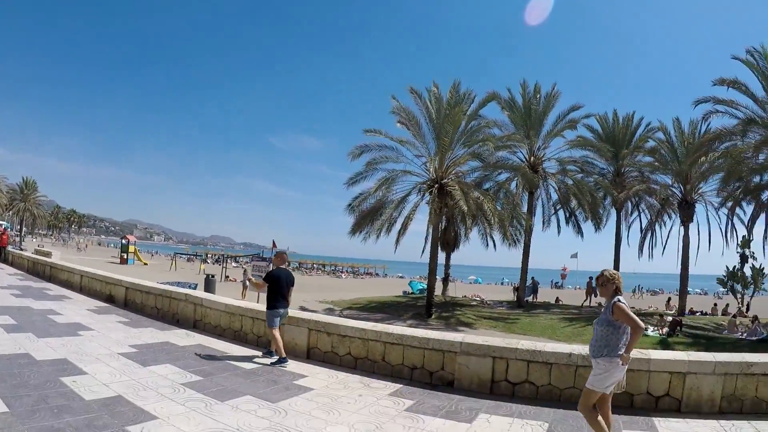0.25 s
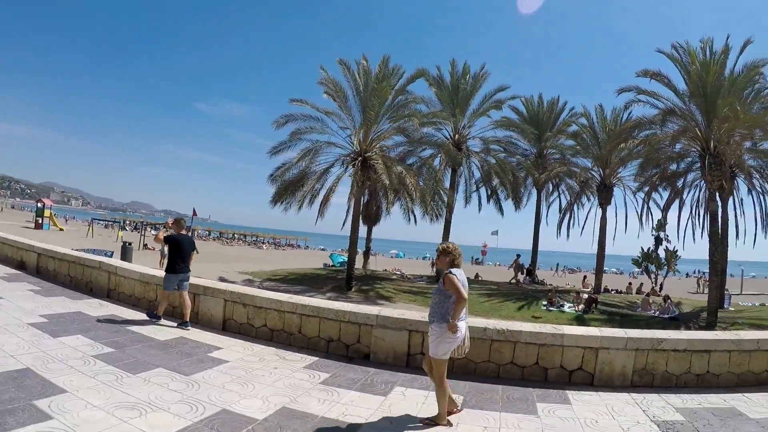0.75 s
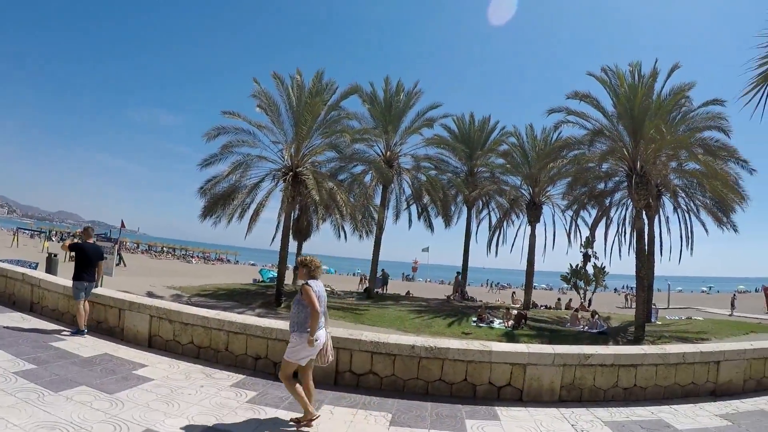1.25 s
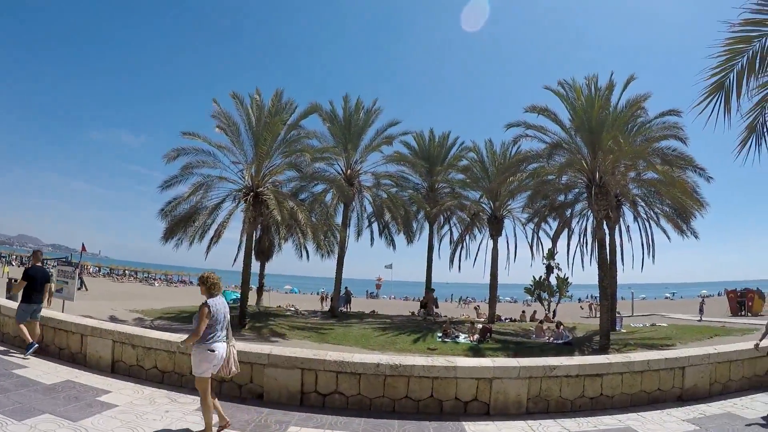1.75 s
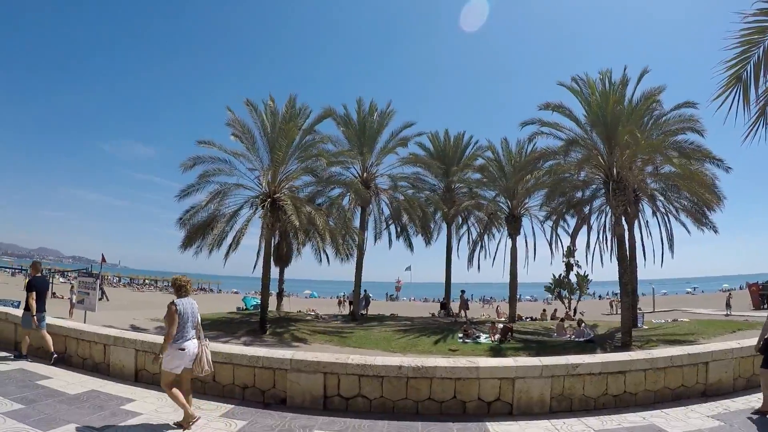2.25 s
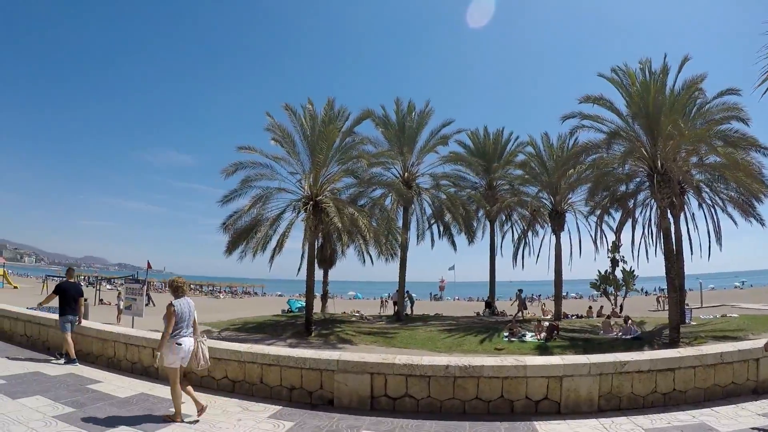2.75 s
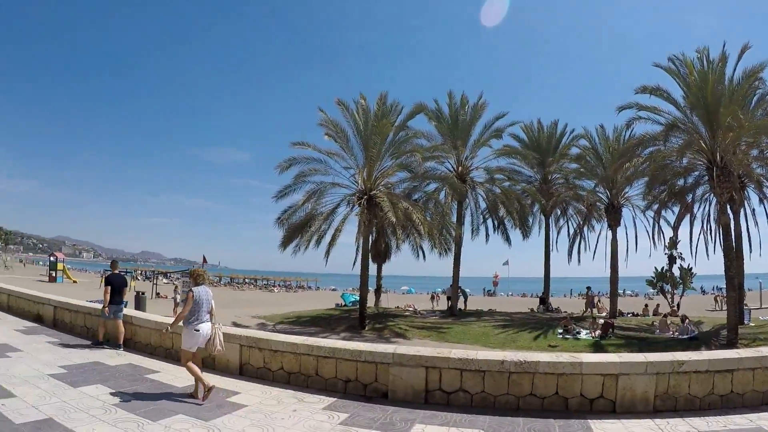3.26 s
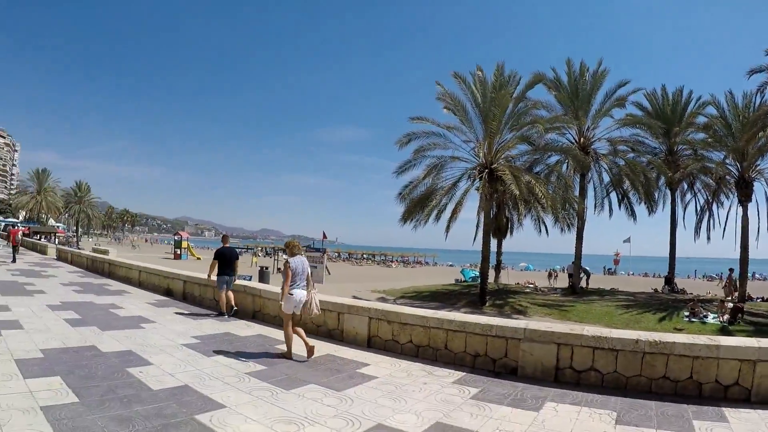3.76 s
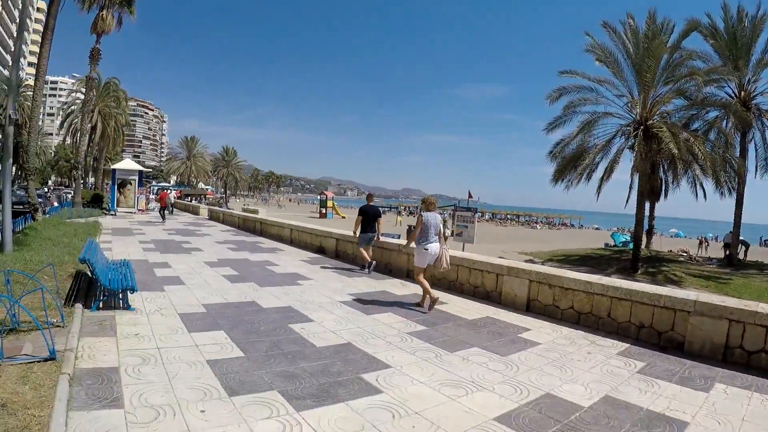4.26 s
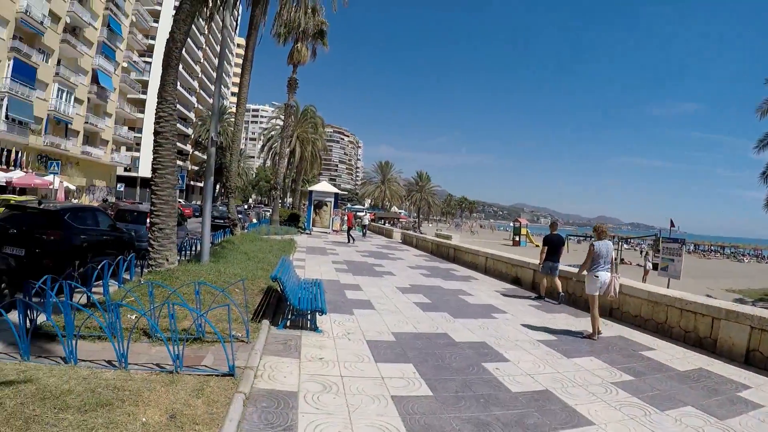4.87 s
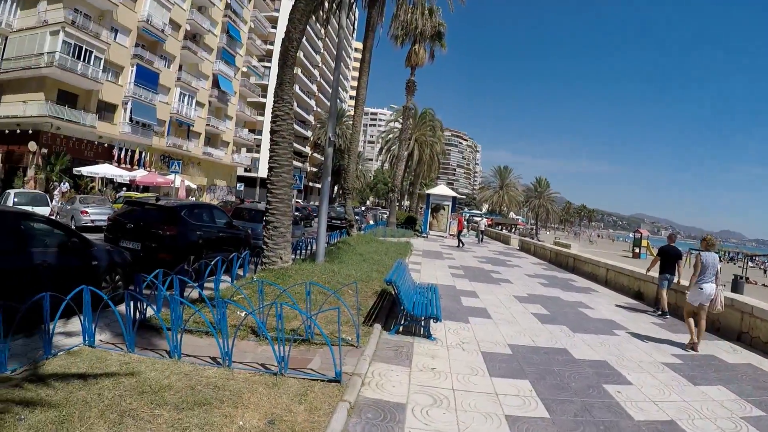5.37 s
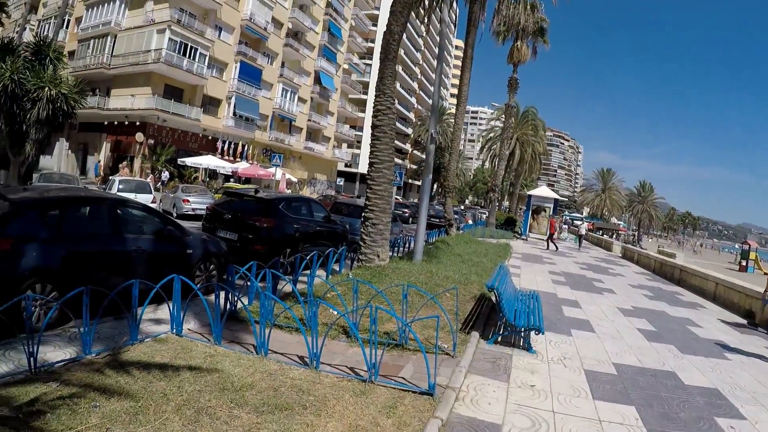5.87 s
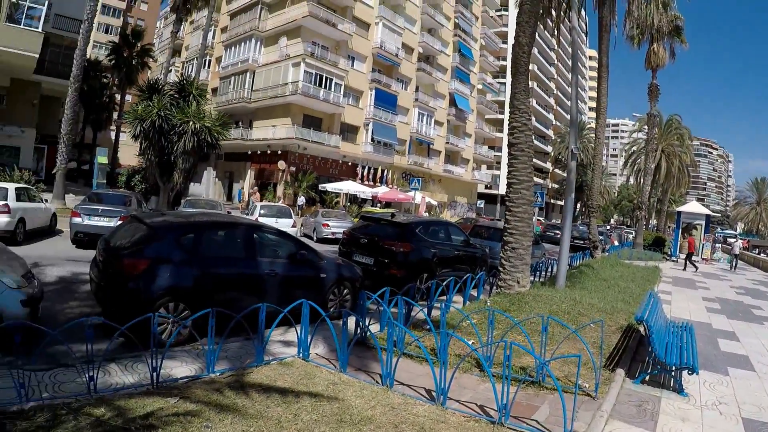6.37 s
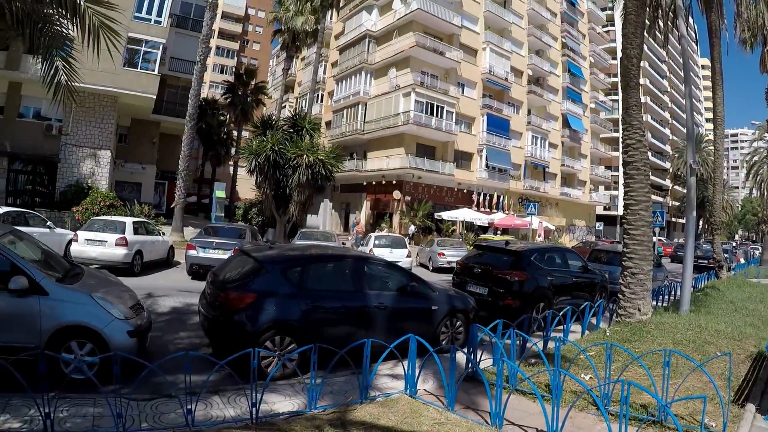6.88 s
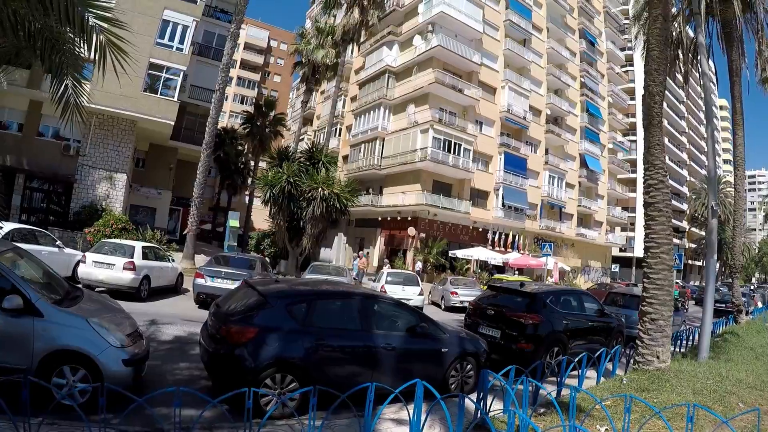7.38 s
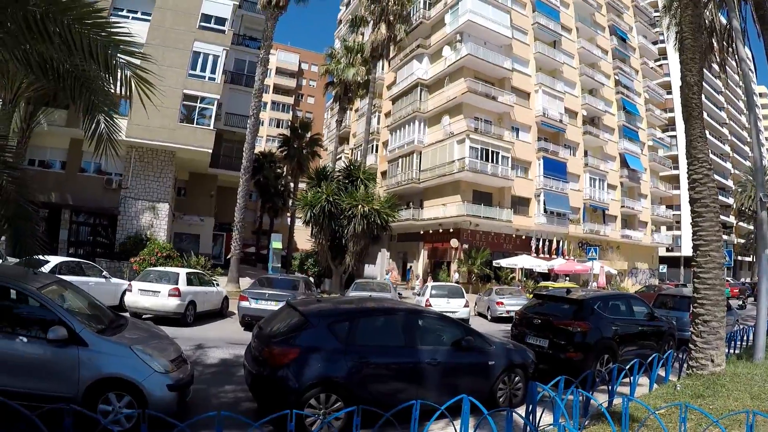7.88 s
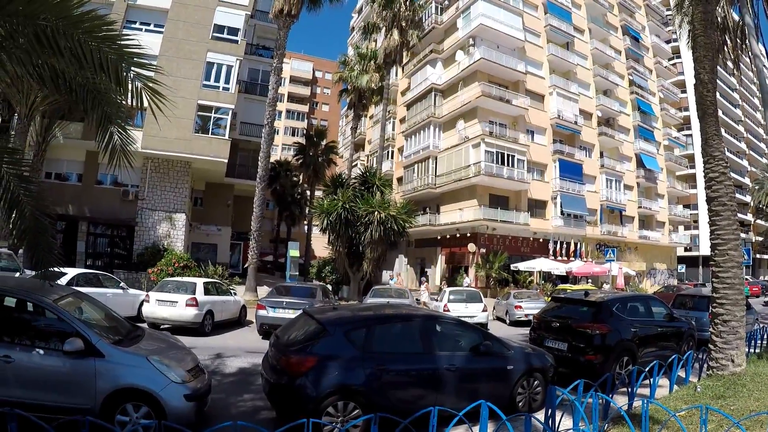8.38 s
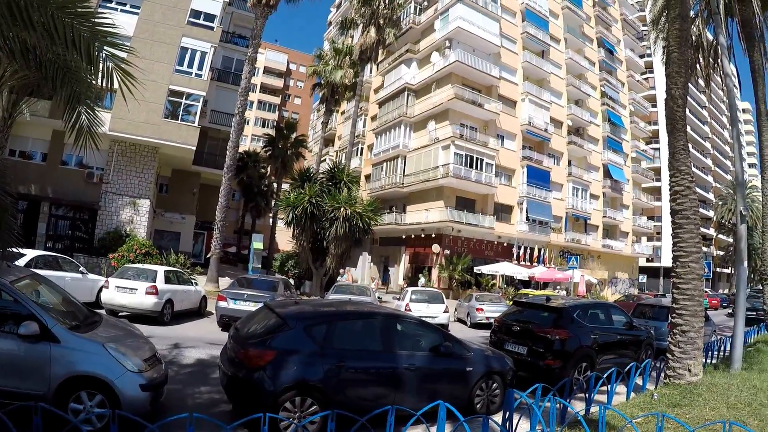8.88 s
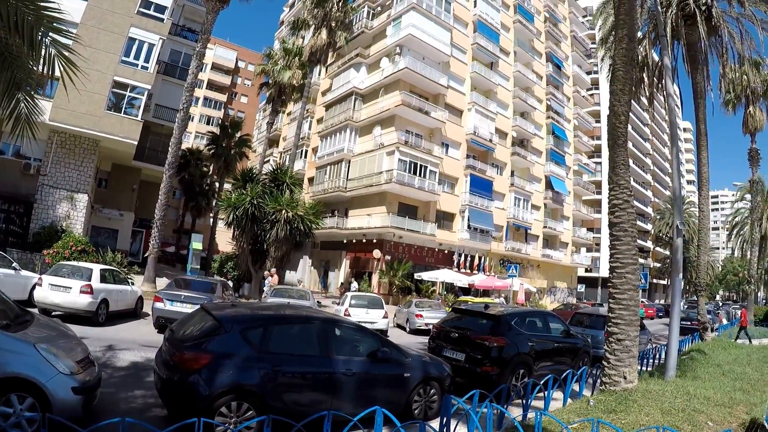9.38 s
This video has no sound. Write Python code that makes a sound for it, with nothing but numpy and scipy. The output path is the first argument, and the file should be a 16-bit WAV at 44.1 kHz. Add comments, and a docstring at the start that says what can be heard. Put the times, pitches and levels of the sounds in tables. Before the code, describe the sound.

Wind rumbles in lumps against a small camera's two microphones while parakeets squawk in nearby trees. Brief, bright chirps and hoarse cries come in clusters with gaps; a distant engine hums up and down once. Later the calls break into rattling screeches, then after a short lull turn into rapid, jumpy two-register chatter. Behind everything lies a quiet, uneven wash of surf and street, with slight open-air echoes.

```python
"""A flock of parakeets squawks in palm trees by a seafront: warbled notes are gliding stacks of overtones,
rattled squawks are bursts of hoarse voice through a ringing throat, and chatter flips between two registers.
Wind buffets the two microphone ports of a small camera, as lumpy low noise with a sharper edge.
Surf and street noise lie behind as slowly swelling noise, with a few dry ticks; a far engine revs once,
made of three sines that rise and fall together."""
import sys
import numpy as np
from scipy import signal
from scipy.fft import rfft, irfft, next_fast_len
from scipy.io import wavfile
from scipy.ndimage import uniform_filter1d, map_coordinates

SR = 44100
rng = np.random.default_rng(int(sys.argv[2]) if len(sys.argv) > 2 else 0)


def digitize_waveform(pressure):
    """Quantize a signal to 16-bit integers and store it at the path in sys.argv[1].

    Rows of a 2-D input are taken as channels; values are limited to [-1, 1].
    """
    field = np.atleast_2d(pressure).T
    bounded = np.clip(field, -1, 1)
    quanta = np.round(bounded * 32767).astype(np.int16)
    wavfile.write(sys.argv[1], SR, quanta)


N = 424683

# Clear notes. Each row: start in seconds, length in milliseconds, middle pitch in Hz before the warble,
# glide over the note in %, number of the overtone the beak favours, level in dB before the trembling.
NOTES = [(.355, 37, 2670, -34, 1, -41.5), (.46, 24, 5304, -5, 1, -44.5), (.482, 43, 5380, 3, 1, -32.5),
         (.527, 48, 5350, 0.5, 1, -40), (.574, 32, 892, 6, 6, -36), (0.612, 32, 1205, -9.5, 2, -36),
         (0.7, 25, 2270, 4, 3, -33.5), (1.157, 8.5, 1650, -40, 2, -47), (1.167, 8, 1226, 3, 2, -40.5),
         (1.206, 52, 1834, 3, 2, -39.5), (1.513, 32, 628, 0.5, 4, -46), (1.548, 26, 1043, 1, 2, -48),
         (1.681, 20.5, 2180, -2, 1, -44.5), (1.78, 32, 973, 9.5, 3, -31.5), (1.813, 15, 1600, 4, 2, -35),
         (1.828, 26, 1466, -12, 2, -38), (1.86, 18, 1960, 0, 2, -40), (1.882, 24, 1215, -3, 2, -39),
         (2.15, 39, 837, 15, 3, -39.5), (2.346, 27, 1810, -4.5, 1, -35), (2.432, 35, 927, 10.5, 3, -32.5),
         (2.466, 21, 1180, -3.5, 4, -31), (2.494, 8, 1970, 0, 2, -36), (2.503, 12, 1660, -33, 2, -32),
         (2.562, 12.7, 2060, -11, 2, -36), (2.584, 14, 1650, -23, 2, -37), (3.091, 30, 850, 37, 3, -40),
         (3.125, 28, 1150, -16, 2, -39), (3.157, 10, 1900, -2, 2, -33), (3.171, 7, 1370, -2, 2, -32),
         (3.179, 14.5, 1880, 9, 2, -34), (3.198, 18, 1900, -1, 2, -33.5), (3.22, 7, 1900, -10, 2, -35),
         (3.241, 15, 1310, 35.5, 2, -35), (3.426, 30, 1314, -34.5, 2, -41),
         (3.467, 29, 1514, -18.5, 2, -40.5), (3.624, 27, 897, 45.5, 3, -33), (3.66, 10, 1900, -4, 2, -31),
         (3.701, 13.5, 1480, -36, 2, -36), (3.716, 46, 1235, -5, 2, -40), (3.927, 35, 935, 3, 5, -30.5),
         (3.962, 31, 1096, 5.5, 3, -34), (4, 16, 1300, -25, 2, -39), (4.063, 10, 1396, -24, 2, -36),
         (4.073, 10.6, 1394, 27, 2, -35), (4.936, 7.4, 650, 2, 8, -43), (4.957, 10, 650, 3, 8, -34),
         (4.978, 16, 645, -7, 8, -34.5), (5.008, 13, 630, -14, 4, -38.5), (5.086, 52, 1130, 4.5, 3, -39.5),
         (5.27, 17, 1187, -3, 2, -31.5), (5.49, 18.7, 1055, 4.5, 4, -30), (5.893, 23, 830, 22, 4, -32),
         (6.054, 35.6, 2670, 7.5, 1, -27.5), (6.082, 21, 1240, -1, 5, -28.5), (6.28, 27, 1017, 5.5, 6, -28),
         (6.312, 28, 1312, -8.5, 4, -25.5), (7.356, 16, 1366, -10, 2, -41.5),
         (7.378, 24, 1335, -11, 2, -38), (7.518, 19, 2260, 0.5, 1, -32), (7.781, 13, 930, 1, 4, -37),
         (7.813, 20, 960, -6, 4, -38), (7.851, 23, 1596, 5, 2, -41), (7.874, 13, 1356, -54, 2, -32.5),
         (7.907, 7.6, 1395, -52, 2, -31), (7.965, 18, 786, 14, 3, -36), (7.988, 17, 1307, 17, 3, -32),
         (8.013, 14, 2040, 3.5, 2, -24), (8.035, 8.7, 1257, -5, 3, -36),
         (8.05, 12.8, 1980, -12.5, 2, -28.5), (8.07, 15, 1255, 5, 2, -34), (8.095, 7, 1650, -9.5, 2, -25.5),
         (8.119, 7.2, 2010, 1, 2, -28), (8.133, 13, 1195, -5, 2, -28.5), (8.15, 20.5, 2050, -8, 2, -26.5),
         (8.191, 18, 1814, -42, 2, -35), (8.27, 21, 1130, 9, 4, -32.5), (8.296, 23, 1152, 10.5, 2, -30.5),
         (8.328, 22, 2050, -15, 2, -22.5), (8.351, 10, 1200, 1, 2, -28), (8.372, 19, 2160, -5, 2, -31),
         (8.432, 13, 2110, -3, 2, -29), (8.446, 16, 1103, 17, 4, -32), (8.472, 16, 2074, 5, 2, -25),
         (8.508, 12, 2024, -7, 2, -26), (8.526, 11, 2350, 7, 2, -26.5), (8.541, 8.9, 1700, -39, 2, -36),
         (8.6, 10, 1970, -14, 2, -24.5), (8.615, 6.4, 1473, 3, 2, -27), (8.631, 6, 1520, -2, 2, -27),
         (8.638, 12.7, 2000, -17.5, 2, -24.5), (8.665, 17, 1907, 0, 2, -19), (8.688, 9.6, 2250, 8, 2, -28),
         (8.735, 8.4, 2200, 3, 2, -33), (8.772, 7.5, 2130, 2, 2, -28.5), (8.787, 16, 1550, -42, 2, -32.5),
         (8.748, 47, 2120, 18.5, 1, -37), (8.89, 24, 1975, 6, 3, -30.5), (8.897, 12, 1247, 3, 3, -30),
         (8.918, 7.7, 2014, 2, 2, -24), (8.932, 14, 1280, -1.5, 4, -25.5), (8.954, 14, 1300, 1.5, 4, -29),
         (8.985, 8.1, 2010, 0.5, 2, -21.5), (9.016, 13, 1954, -2.5, 2, -30.5),
         (9.04, 17, 1112, 9.5, 2, -34.5), (9.179, 29, 827, 14, 3, -36), (9.212, 24, 1034, 1, 5, -30.5),
         (9.249, 6.3, 1800, 1, 2, -28), (9.26, 31.4, 1114, 8, 4, -27.5), (9.348, 11, 2210, 0.5, 2, -30.5),
         (9.366, 29, 957, 6.5, 3, -40), (9.399, 25, 975, -5, 4, -37.5), (9.427, 24, 1520, -11, 2, -35),
         (9.468, 17.4, 1415, -13, 2, -34), (9.512, 5.8, 1960, -2, 2, -23), (9.524, 7.7, 1393, 5, 2, -32),
         (9.547, 13.6, 1985, -13.5, 2, -27), (9.572, 6, 1940, -6.5, 2, -29),
         (9.588, 23.4, 2004, -13, 2, -26.5)]
# How strongly each frequency of a bird's voice comes through. Each row: frequency in Hz, relative level in dB.
VOICE = [(600, -19), (1400, -10.5), (2300, 1.5), (3800, -1), (5200, -2.5), (7000, -0.5), (8300, -14.5),
         (10700, -23.5), (14500, -97)]


def amp(db):
    """Turn decibels into a plain multiplier."""
    return 10 ** (np.asarray(db) / 20)


def unit(x):
    """Scale a sound to an average strength (rms) of 1."""
    return x / np.sqrt(np.mean(x ** 2) + 1e-20)


def along(points, hz):
    """Read a curve of (Hz, value) points on a log frequency axis."""
    f, v = np.transpose(points)
    return np.interp(np.log(hz + 1), np.log(f + 1), v)


def curves(rows):
    """Give one value per sample for each column after the time."""
    times, *columns = np.transpose(rows)
    return [np.interp(np.arange(N) / SR, times, column) for column in columns]


def wobble(rate):
    """A smooth random curve through `rate` random points a second."""
    points = rng.standard_normal(int(N * rate / SR) + 4)
    return map_coordinates(points, [np.arange(N) * rate / SR])


def filtered(x, response):
    """Multiply the spectrum of x by a response to frequency, which may be complex."""
    m = next_fast_len(N + SR // 2)
    return irfft(rfft(x, m) * response(np.fft.rfftfreq(m, 1 / SR)), m)[..., :N]


def noise(spectrum):
    """Random noise shaped by a table of (Hz, dB), rms 1."""
    return unit(filtered(rng.standard_normal(N), lambda hz: amp(along(spectrum, hz))))


def ringing(x, modes, tuning, leak):
    """Pass x through resonances side by side; a share leaks past them. The result has rms 1."""
    out = leak * x
    for hz, width, db in modes:
        b, a = signal.iirpeak(hz * tuning, hz / width, SR)
        out = out + amp(db) * signal.lfilter(b, a, x)
    return unit(out)


def voice(pitch):
    """A buzzing membrane: a flat stack of up to ten overtones, rms 1."""
    phase = 2 * np.pi * np.cumsum(pitch) / SR
    return unit(sum(np.cos(k * phase + k * k) * (k * pitch < 14000) for k in range(1, 11)))


def gusts():
    """Strength of the wind in dB: each gust climbs out of the breeze and sinks back."""
    # Wind between the gusts. Each row: time in seconds, strength in dB.
    breeze = [(0, -25.5), (1.1, -35), (1.5, -33.5), (3, -45), (3.6, -35), (5.9, -34), (6.3, -49),
              (9.63, -41)]
    # Each row: time of the peak in seconds, peak strength in dB, seconds to climb the last 10 dB,
    # seconds to sink the first 10 dB.
    peaks = [(.18, -20, 0.11, 0.2), (.59, -26.5, 0.21, 0.75), (3.19, -22, 0.19, 0.19),
             (4.91, -20, 0.16, 0.058), (5.04, -20.5, 0.064, 0.097), (5.25, -24.5, 0.1, 0.23),
             (5.98, -25.5, 0.092, 0.24), (6.63, -27.5, 0.34, 0.27), (6.95, -24.5, 0.22, 0.18),
             (7.72, -27.5, 0.31, .98), (8.58, -19, 0.16, 0.087), (9.52, -26.5, 0.12, 0.14)]
    strength_db, = curves(breeze)
    t = np.arange(N) / SR
    for peak, db, rise, fall in peaks:
        distance = np.where(t < peak, (peak - t) / rise, (t - peak) / fall)
        strength_db = np.maximum(strength_db, db - 10 * distance)
    return strength_db


def wind():
    """Lumpy turbulence at each port: harder gusts get a sharper edge and strike the left port more."""
    # Three noise colours: steady low wind, buffeting, sharp edge. Each row: frequency in Hz, relative level in dB.
    rumble_colour = [(30, -9), (60, -9), (110, -14), (300, -85)]
    buffet_colour = [(30, -11), (70, -0.5), (120, 4), (180, -3), (300, -20), (600, -87.5)]
    edge_colour = [(120, -39), (200, 0.5), (400, -11.5), (800, -26.5), (1500, -101)]
    gust_db = gusts()
    force = gust_db + 30.5  # dB above a middling wind
    shared_rumble, shared_edge = noise(rumble_colour), noise(edge_colour)
    pair = []
    for side in (1, -1):  # left, right
        lumps = unit(amp(0.45 * wobble(19) + 3.53 * wobble(40)))
        # The edge partly pushes one port as it pulls the other.
        edge = 0.62 * side * shared_edge + 0.66 * noise(edge_colour)
        turbulence = noise(buffet_colour) + amp(-12.0 + .5 * force) * edge
        buffeting = amp(gust_db + 1.5 + side * (3.5 + 0.16 * force)) * lumps * turbulence
        rumble_level = amp(-31.5 + 0.25 * force + 1.0 * side + 1.25 * wobble(6.0))
        rumble = rumble_level * (shared_rumble + 0.5 * noise(rumble_colour))
        pair.append(buffeting + rumble)
    return np.array(pair)


def surf_and_street():
    """Broad noise that swells and sinks: a part shared by the ports and a part that differs between them."""
    # Colour of surf and street. Each row: frequency in Hz, relative level in dB.
    shore = [(120, -44), (200, -2), (330, -5.5), (700, -6.5), (900, -11), (1760, -12), (2560, -20),
             (6100, -21.5), (8200, -30), (10700, -40), (14500, -49)]
    swell = amp(-40.5 + 1.98 * wobble(1.563) + 1.04 * wobble(11))
    return swell * noise(shore), 2 * swell * noise(shore)


def squawks():
    """Level and treble of the rough voices in dB: the loudest squawk of the moment, or the far murmur."""
    # Far birds between the squawks. Each row: time in seconds, level in dB.
    murmur = [(0, -57), (.7, -38.5), (1.1, -54.5), (1.5, -65), (2, -41.5), (2.7, -47), (3.8, -50),
              (4.15, -48.5), (4.9, -55), (5.3, -44.5), (6, -41), (7.3, -38), (7.7, -50.5), (9.63, -38.5)]
    # Rough squawks. Each row: start in seconds, length in seconds, level at the start in dB before the ends
    # are softened, swell over the call in dB, treble against the level in dB.
    calls = [(0.053, 0.058, -38, -7.5, -2), (0.275, 0.11, -34.5, 4, -5.5), (0.587, 0.069, -30, -7, 2),
             (0.692, 0.052, -35, -1.5, 2), (1.105, 0.14, -43, 5.5, -1.5), (1.474, 0.13, -42, -5, -4),
             (1.613, 0.28, -46, 4, -5), (1.787, 0.15, -33, 1.5, -3), (2.14, 0.11, -38, 2, -3.5),
             (2.316, 0.067, -38.5, 0, -10), (2.433, 0.084, -31, 0.5, -13), (2.55, 0.076, -32.5, -4, -17),
             (2.884, 0.14, -41.5, -3.5, -5), (3.115, 0.16, -26, -9.5, -6), (3.391, 0.11, -39, 1, -14),
             (3.528, 0.075, -38.5, 2.5, -10), (3.619, 0.14, -33.5, -1, 1), (3.942, 0.044, -26, -4, 3.5),
             (4.054, 0.031, -33.5, 2.5, -11), (4.926, 0.12, -43, 0.5, -5), (5.08, 0.03, -33, -12, 1),
             (5.137, 0.18, -41, 3, -9.5), (5.33, 0.083, -37, -4.5, 5), (5.406, 0.11, -35.5, 0.5, 4),
             (5.566, 0.31, -39.5, 0.5, -0.5), (5.893, 0.065, -29.5, -7, -6.5),
             (6.039, 0.048, -34, 12, -3.5), (6.175, 0.14, -34.5, -6.5, 0.5), (6.269, 0.074, -28, 7.5, -1.5),
             (6.364, 0.47, -29, -5, 1.5), (6.675, 0.19, -25, -2, -5), (6.975, 0.3, -29, -4.5, 1.5),
             (7.381, 0.095, -39.5, 7.5, -3), (7.493, 0.13, -29, -7.5, -13), (7.777, 0.13, -30, -5, -4.5),
             (7.968, 0.25, -35.5, 6.5, -5.5), (8.278, 0.12, -26, -3.5, -2), (8.397, 0.096, -34.5, 5.5, -1),
             (8.52, 0.17, -33, 2.5, 2.5), (8.72, 0.066, -30.5, 9.5, 1), (8.896, 0.22, -26, -8.5, -3),
             (9.193, 0.14, -27, -7.5, 3), (9.354, 0.086, -38.5, 13, 0), (9.469, 0.16, -28.5, -9, 1)]
    attack, release = 652, 506  # dB per second, before and after the call
    edge_drop_db = 2.5  # the ends sit under the middle
    hush_db = -7.5  # the rasp yields while a clear note sounds
    t = np.arange(N) / SR
    level_db, = curves(murmur)
    treble_db = np.full(N, -8.)  # treble of the murmur
    for start, length, db, swell_db, bright_db in calls:
        on = slice(max(round((start - .1) * SR), 0), round((start + length + .1) * SR))
        u = np.clip((t[on] - start) / length, 0, 1)  # 0 to 1 through the call
        call_db = db + swell_db * u - edge_drop_db * (2 * u - 1) ** 2
        call_db -= attack * np.maximum(start - t[on], 0)
        call_db -= release * np.maximum(t[on] - start - length, 0)
        treble_db[on] = np.where(call_db > level_db[on], bright_db, treble_db[on])
        level_db[on] = np.maximum(level_db[on], call_db)
    for start, ms, *_ in NOTES:
        level_db[round(start * SR):round((start + ms / 1000) * SR)] += hush_db
    return uniform_filter1d(level_db, size=300), uniform_filter1d(treble_db, size=900)


def chatter():
    """Two birds, one leading, flip quickly between a low and a high register, over some rasp."""
    # Rings in the beak. Each row: frequency in Hz, width in Hz, level in dB.
    beak = [(2110, 3000, 3), (3440, 2900, 5), (5730, 1800, 7.5)]
    out = .5 * rng.standard_normal(N)  # rasp
    for hz, rate, db in ((1560, 42, 0), (1150, 31, -3)):  # central pitch, typical flips up and down a second
        flip_rate = rate * np.exp(.45 * wobble(20))
        zigzag = np.tanh(2.6 * np.sin(2 * np.pi * np.cumsum(flip_rate) / SR))
        swing = .23 + .08 * wobble(12)
        unsteady = .05 * wobble(15) + .02 * wobble(90) + .008 * wobble(300)
        out += amp(db + 2.5 * wobble(30)) * voice(hz * np.exp(swing * zigzag + unsteady))
    return ringing(out, beak, 1, leak=.35)


def flock():
    """The rough voices, rattling or chattering, darker or brighter as the birds turn."""
    level_db, treble_db = squawks()
    bursts, rattling = rattle()
    source = bursts + (1 - .75 * rattling) * chatter()
    # Quiet voices are far off and blur into rasp.
    far = np.clip((-33 - level_db) / 8, 0, 1.8)
    source = (source + far * rng.standard_normal(N)) / np.sqrt(1 + far ** 2)

    def high(hz):
        return 1 / (1 + (4800 / (hz + 1)) ** 8)  # passes the treble above about 4800 Hz

    body = unit(filtered(source, lambda hz: amp(along(VOICE, hz)) * (1 - high(hz))))
    treble = unit(filtered(source, lambda hz: amp(along(VOICE, hz)) * high(hz)))
    return amp(level_db) * (body + amp(treble_db) * treble)


def ticks():
    """Dry ticks nearby: a grain of noise and a short ring die away together."""
    # Each row: time in seconds, level at the start in dB of the noise in the tick.
    tick_rows = [(.207, -30.5), (.604, -38), (0.7, -31), (1.205, -51), (1.475, -41)]
    out, t = np.zeros(N), np.arange(300) / SR
    for start, db in tick_rows:
        knock = rng.standard_normal(300) + 2 * np.sin(2 * np.pi * 1900 * t)
        out[round(start * SR):][:300] += amp(db - 60 * t / 0.0078) * knock  # falls 60 dB in 7.8 ms
    return out


def rattle():
    """Bursts of hoarse voice through a narrowed throat; also tells when the rattling lasts."""
    # Squawks that break into bursts. Each row: start in seconds, end in seconds, bursts a second,
    # depth of the bursts in dB, pitch in Hz before sag and jitter, tuning factor of the throat,
    # boost of the lower throat rings in dB.
    rattle_rows = [(0.275, 0.4, 48, 5, 980, 1.1, -16), (5.17, 5.325, 38, 21, 1330, 0.91, -2),
                   (5.338, 5.463, 41.2, 9, 1010, 0.84, 8.5), (5.547, 5.873, 50, 9, 946, 0.81, -7),
                   (6.152, 6.271, 43, 9, 948, 1, 4), (6.353, 6.448, 70, -3, 1011, 1.14, 1),
                   (6.452, 6.656, 80, 5, 870, 0.992, -10), (6.683, 6.851, 47.5, 12, 1021, 1.02, -9),
                   (6.959, 7.288, 43, 8, 1001, .99, -6)]
    # Rings of the throat. Each row: frequency in Hz and width in Hz, both before tuning, and level in dB
    # before boost and sway.
    throat = [(2480, 93, -10), (3300, 980, -4), (4490, 330, -3.5), (6170, 230, -1.5), (7060, 480, -2.5)]
    settle = .93, .965, 1  # the upper rings climb through these tunings as a rattle begins
    out, rattling = np.zeros(N), np.zeros(N)
    drift, size_db = .04 * wobble(25), 2.2 * wobble(70)
    jitter = .03 * wobble(60) + .025 * wobble(500)
    sways = [wobble(25) for ring in throat]  # each ring swells and fades on its own
    for start, end, rate, depth_db, hz, tuning, low_db in rattle_rows:
        on = slice(round(start * SR), round(end * SR))
        t = np.arange(on.stop - on.start) / SR
        cycle = (t * rate + drift[on]) % 1  # bursts come a little early or late
        burst = np.clip(np.minimum((cycle - .15) / 0.018, (1 - cycle) / 0.33), 0, 1)  # quick onset, slower fall
        pitch = hz * (1 + .12 * (.55 - cycle)) * np.exp(jitter[on])  # each burst sags in pitch
        hoarse = voice(pitch) + 1.1 * rng.standard_normal(len(t))
        step = np.minimum(t * 25, 2)  # 25 settling steps a second
        modes = []
        for (centre, width, db), sway in zip(throat, sways):
            ring_db = db + low_db * (centre < 4000) + 1.5 * sway[on]
            for i, shift in enumerate(settle):
                fade_db = 20 * np.log10(np.clip(1 - abs(step - i), 1e-3, 1))  # crossfade between the tunings
                modes.append((centre * (shift if centre > 5000 else 1), width, ring_db + fade_db))
        out[on] = ringing(amp(depth_db * burst + size_db[on]) * hoarse, modes, tuning, leak=.13)
        rattling[on] = 1
    return out, uniform_filter1d(rattling, size=400)


def slur(start, ms, end_hz):
    """Gap in seconds and pitch in Hz of a note close behind to slur into, else no gap and the same pitch."""
    for next_start, _, next_hz, next_glide, *_ in NOTES:
        gap = next_start - start - ms / 1000
        if -.004 < gap < .017 and max(next_hz, end_hz) < 2500 and end_hz > 750:
            return gap, next_hz * (1 - next_glide / 200)
    return 0, end_hz


def overtone_gains(pitch, length, k, best, db, low):
    """Strength of each overtone k: the beak lifts those near its favoured frequency."""
    def near(hz):
        return np.exp(-((k * pitch - hz) / 450) ** 2)

    # The beak holds its shape through the slur.
    favoured = best * np.pad(pitch[:length], (0, len(pitch) - length), "edge")
    lift = near(favoured)
    lift += amp(-8) * (k == 2) * (1 - lift) * (abs(k * pitch - 3500) < 1500) * (best > 1.5)
    lift += low * amp(-5) * (1 - lift) * (near(2800) + near(4900))  # low notes ring twice in the throat
    slurring = 1. * (np.arange(len(pitch)) >= length)
    lift *= amp(-11 * uniform_filter1d(slurring, size=90))  # the voice thins in a slur
    # The other overtones gain 0.7 dB for each dB of the note.
    loud_db = -30
    others_db = -36.5 + .7 * (db - loud_db) - db + along(VOICE, k * pitch)
    others_db = others_db - 5 * (k == 1) * (db > loud_db) + rng.normal(0, 3, k.shape)
    return (lift + amp(others_db)) * (k * pitch < 14000)


def notes():
    """Each note is a gliding stack of overtones; it slurs into one that follows closely."""
    out, k = np.zeros(N + SR), np.arange(1, 13)[:, None]
    for start, ms, hz, glide, best, db in NOTES:
        length = round(ms * SR / 1000)
        low = 750 < hz < 1100
        pitch = hz * (1 + glide / 100 * np.linspace(-.5, .5, length))
        gap, aim = slur(start, ms, pitch[-1])
        tail = np.geomspace(pitch[-1], aim, round((max(gap, 0) + .004) * SR))
        pitch = np.r_[pitch, tail]
        age = np.arange(len(pitch)) / SR
        # The membrane is unsteady; notes under 4000 Hz also warble.
        unsteady = 0.0095 * np.sqrt(60) * uniform_filter1d(rng.standard_normal(len(pitch)), size=60)
        warble = 0.02 * np.sin(age * rng.uniform(297, 496) + rng.uniform(0, 2 * np.pi)) * (hz < 4000)
        pitch *= 1 + unsteady + warble
        gain = overtone_gains(pitch, length, k, best, db, low)
        phase = k * 2 * np.pi * np.cumsum(pitch) / SR + rng.uniform(0, 7.1, k.shape)
        stack = np.sum(gain * np.sin(phase), axis=0)
        fade = np.clip(np.minimum(age / 0.004, (age[-1] - age) / 0.004), 0, 1)
        swell = amp(-5 * low * np.clip(1 - 2000 * age / ms, 0, 1))  # low notes swell over their first half
        tremble_db = 2.7 * np.sin(age * rng.uniform(157, 500))
        out[round((start - .002) * SR):][:len(age)] += amp(db + tremble_db) * fade * swell * stack
    return out[:N]


def engine():
    """A far engine revs once: two close tones and a faint one above them rise and fall together."""
    # Each row: time in seconds, pitch of the lowest tone in Hz, level in dB before the lift and wavering.
    revs = [(1.201, 98.95, -35), (2.133, 130.7, -34), (2.96, 114, -39)]
    hz, db = curves(revs)
    t = np.arange(N) / SR
    phase = 2 * np.pi * np.cumsum(hz) / SR
    fade = np.clip(np.minimum(t - revs[0][0], revs[-1][0] - t) / 0.099, 0, 1)
    tones = np.sin(phase) + 0.61 * np.sin(phase * 6 / 5) + 0.1 * np.sin(phase * 12 / 5)
    return fade * amp(db + 3.0 + 2.2 * wobble(6.11)) * tones


def echoes(x, t60):
    """A scattered answer: random reflections that fall 60 dB in t60 seconds."""
    t = np.arange(SR // 3) / SR
    tail = rng.standard_normal(len(t)) * amp(-60 * t / t60)
    return signal.fftconvolve(x, tail / np.linalg.norm(tail))[:N]


def ports(near, spread):
    """The two ports hear the same air with a phase gap; the spread part differs between them."""
    # Phase gap between the ports. Each row: frequency in Hz, lead of the left port in radians.
    lead = [(200, .5), (860, -2.5), (1640, 0), (2330, -.7), (3500, -.3), (5250, .8), (6200, 2.1),
            (9000, 2.1)]
    # Each row: frequency in Hz, likeness of left and right (1 is the same) for equally loud near and spread.
    alike = [(200, 0.997), (1000, 0.71), (2500, 0.72), (5000, 0.88), (10000, 0.59)]

    def turn(hz):
        return np.arccos(np.clip(along(alike, hz), 0, 1)) / 2

    def gap(hz):
        return np.exp([[.5j], [-.5j]] * along(lead, hz))

    same = filtered(near, lambda hz: np.cos(turn(hz)) * gap(hz))
    opposed = filtered(spread, lambda hz: np.sin(turn(hz)) * gap(hz) * [[1], [-1]])
    return same + opposed


def scene():
    """Birds with their echoes, shore, ticks and engine reach the ports through the air; wind strikes them."""
    shore_shared, shore_spread = surf_and_street()
    birds = notes() + flock()
    yard = amp(-12.5) * echoes(birds, .4)  # trunks, wall and paving answer
    near = birds + yard + shore_shared + ticks() + engine()
    # Fronds scatter the calls differently to each port.
    fronds = .5 * echoes(birds, .012) + 1.1 * echoes(birds, .15)
    balance = amp([[1.2], [-.8]])  # left a little louder
    return ports(near, fronds + shore_spread) * balance + wind()


def record(dry):
    """Hard gusts saturate softly; the camera keeps nothing above its band limit."""
    soft = dry / (1 + np.abs(dry / .85) ** 6) ** (1 / 6)
    return filtered(soft, lambda hz: hz < 14900)


dry = scene()
out = record(dry)
digitize_waveform(out)
```